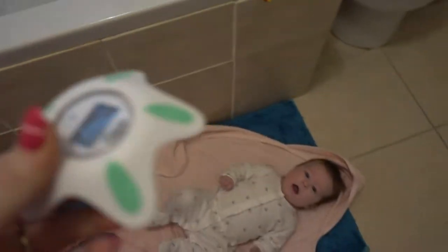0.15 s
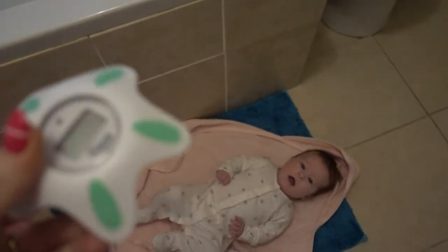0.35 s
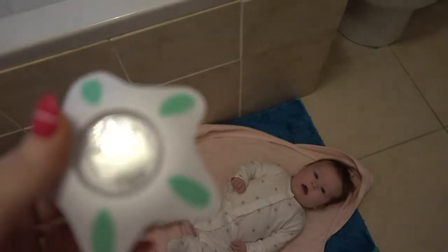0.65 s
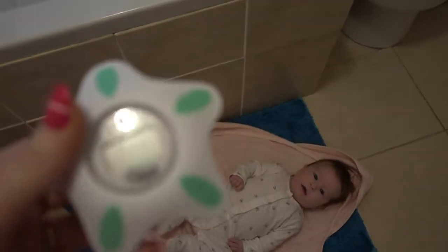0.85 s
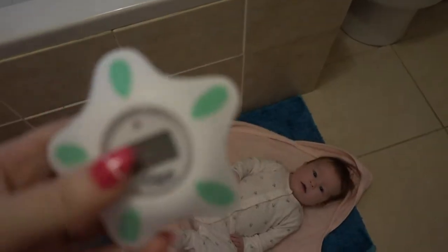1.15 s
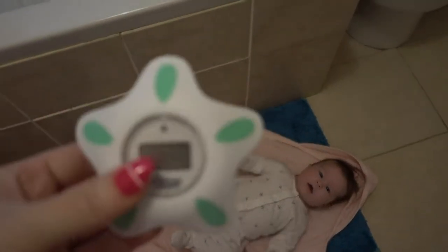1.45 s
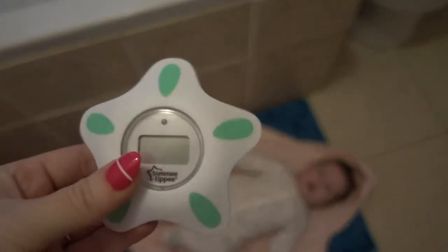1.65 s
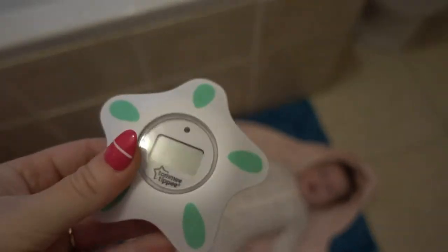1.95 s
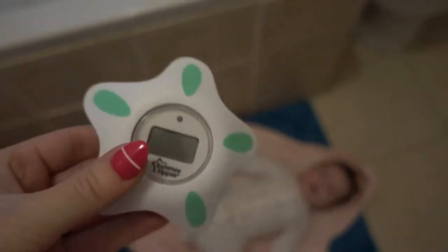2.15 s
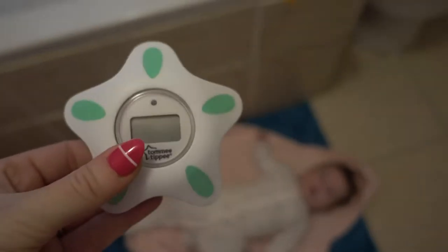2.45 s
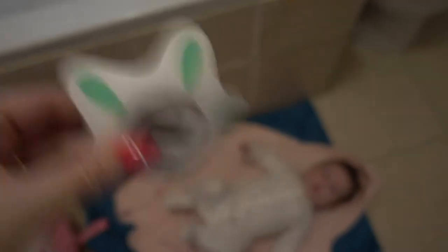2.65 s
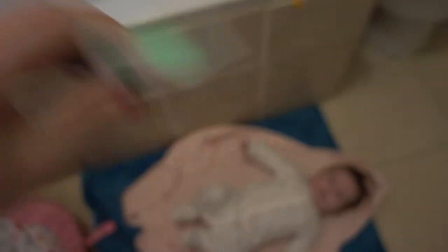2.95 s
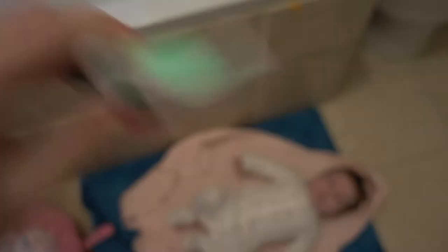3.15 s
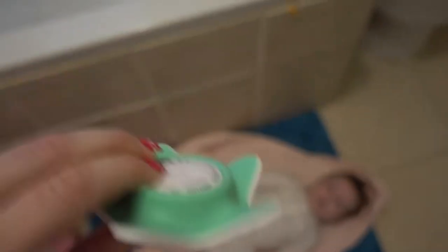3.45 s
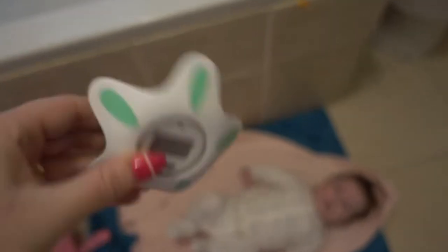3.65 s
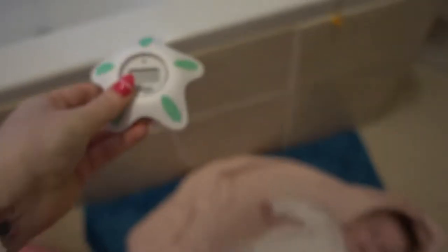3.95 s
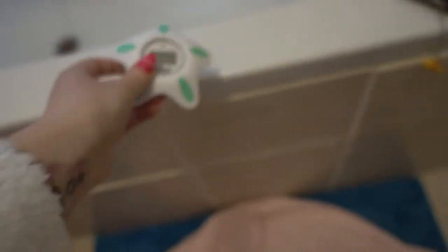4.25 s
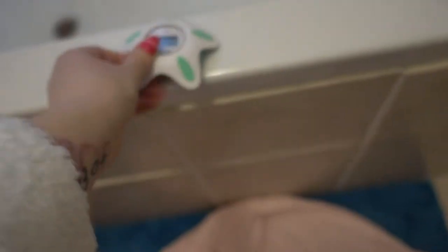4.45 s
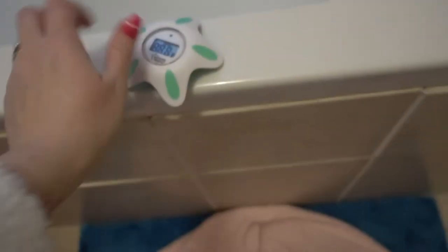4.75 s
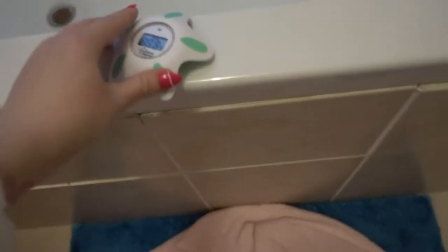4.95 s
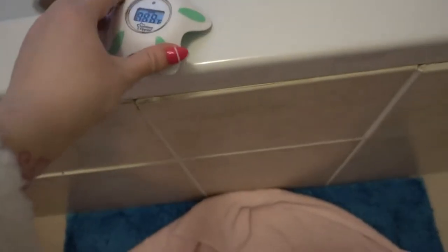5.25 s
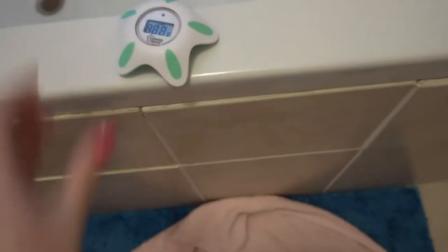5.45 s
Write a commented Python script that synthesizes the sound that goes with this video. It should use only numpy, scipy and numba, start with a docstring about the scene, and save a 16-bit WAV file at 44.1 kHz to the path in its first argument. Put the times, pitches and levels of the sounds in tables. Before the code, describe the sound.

Running bath water fills the whole scene, mid and high pitched with little bass, gurgling and spattering unevenly. Sharp droplet ticks and ringing bubble pops stand out. Late on, two quick groups of light plastic cracks and rattles, with a tiny thin ring and soft thuds, mark an object being set on the rim. Short tiled-room echoes, close stereo pickup, no fade.

```python
"""A jet from a tap plunges into a filling tub and drags air under: a dense churn of ringing bubbles.
Broken-water hiss surrounds it; harder splashes lift both, and ticks of drops and larger pops stand out.
A plastic thermometer is set down on the rim and rocks to rest: cracks, rattles, thin rings and soft thuds.
The small tiled bathroom adds echoes; two close microphone ports hear it from the floor beside the tub."""
import sys
import numpy as np
from scipy import signal
from scipy.fft import rfft, irfft, next_fast_len
from scipy.io import wavfile
from scipy.ndimage import uniform_filter1d
from numba import njit

SR = 44100
rng = np.random.default_rng(int(sys.argv[2]) if len(sys.argv) > 2 else 0)


def log_audio(samples):
    """Write samples as a 16-bit WAV file to the path given in sys.argv[1]."""
    # one column per channel
    frames = np.atleast_2d(samples).T
    # limit to full scale, then quantise
    limited = np.clip(frames, -1, 1)
    pcm = np.round(limited * 32767).astype(np.int16)
    wavfile.write(sys.argv[1], SR, pcm)


N = 246959

# Likeness of sound from all sides at the two ports: (frequency [Hz], left-right likeness [-1 to 1])
PORT_LIKENESS = [(60, 0.83), (130, 1), (290, 1), (640, 0.94), (1410, 0.79), (3100, 0.55), (6820, -0.22),
                 (10000, -0.15), (15000, -0.23)]
# Difference between the ports: (frequency [Hz], left minus right [dB])
PORT_BALANCE = [(60, 0.0), (110, 0.0), (200, -1), (380, -0.5), (700, 1.5), (1290, 0.5), (2380, 0.0),
                (4400, 0.0), (8120, -0.5), (15000, -0.5)]
# background level; each channel's own part against the shared part; mean depth of the unevenness
BACKGROUND_DB, BACKGROUND_OWN_DB, BACKGROUND_UNEVEN_DB = -78, -9, 8
BASS_CUT_HZ, TOP_CUT_HZ = 214, 15850
ROOM_T60_S, ROOM_TREBLE_T60_S, TAP_LEAD_S = 0.28, 0.054, 3e-5
ROOM_DB, NEAR_ROOM_DB = 3, -4   # echoes against direct sound: churn; sources that stand clear of it

# Pushes as the weight of the hand loads the rim: (time [s], level [dB])
RIM_PUSHES = [(4.46, -29.5), (4.49, -35), (4.52, -30), (4.68, -39.5), (4.721, -32), (4.77, -33)]
# Low modes of the rim: (frequency [Hz], relative level [dB], t60 [s])
RIM_MODES = [(180, -17, 0.087), (235, -13, 0.051), (300, -10.5, 0.053), (380, -10, .08)]
# Short bursts of a thin ring near 4.4 kHz: (time [s], peak level [dB], frequency [Hz], life [turns])
THIN_RINGS = [(4.4856, -8.5, 4380, 15), (4.4966, -24, 4360, 37), (4.501, -11.5, 4410, 33),
              (4.511, -18, 4350, 35), (4.527, -19, 4180, 34), (4.8198, -23, 4600, 36)]
# Touches of the thermometer on the rim: (time [s], click level [dB], relative rattle level [dB],
# time to the height of the rattle [s], rattle brightness [dB per octave])
TOUCHES = [(4.4009, -1, 2.5, 0.0046, 3.5), (4.412, -11, -1, 0.0037, 0.6), (4.416, -8, -15, 0.0092, 5),
           (4.4198, 0, -6, 0.015, 2), (4.457, -11, -3, 0.0044, 1.5), (4.468, -20, -12, 0.014, 6),
           (4.664, 0.5, -1.5, 0.019, 2.5), (4.6994, -1, -9, 0.02, -5), (4.7207, -5.5, -15, 0.0053, 11),
           (4.732, -14, -12, 0.0066, 7), (4.74, -22, -10, 0.021, -2), (4.8036, -15, -3.5, 0.0061, 4)]
# Modes of the plastic shell: (frequency [Hz], relative level [dB], t60 [s])
SHELL_MODES = [(298, -24, 0.04), (393, -16, 0.026), (600, -9, 0.02), (777, -16.5, 0.022),
               (1220, -11, 0.0039), (1377, -2.5, 0.013), (1620, 0, 0.0098), (1800, -1.5, 0.01),
               (2080, -3.5, 0.011), (2280, -2, 0.0098), (2336, -2, 0.016), (3273, -1.5, 0.01),
               (3380, -1.5, 0.0077), (4200, -7, 0.006), (6200, -14, 0.0027)]
CRACK_HZ, CRACK_T60_S, CRACK_BASS_CUT_HZ = 2800, 0.0015, 1140
SNAP_HZ, SNAP_DB = 4600, -7   # bright edge of the contact
CRACK_RINGS_DB = -17   # how hard the crack drives the shell
SHELL_BASS_CUT_HZ = 650   # a small shell radiates little bass

# Drops that strike with a dry tick: (time [s], level [dB], frequency [Hz])
DROP_TICKS = [(0.0158, -10, 6500), (0.287, -11, 6540), (0.2926, -8, 6500), (0.3338, -13, 1990),
              (0.563, -12, 6500), (0.576, -11, 5000), (0.585, -9, 4800), (0.762, -13, 7000),
              (0.784, -3, 11000), (4.092, -8, 8500), (4.148, -6, 7000), (4.156, -12, 8500),
              (4.263, -11, 8000), (4.284, -10, 8000), (4.298, -13, 9500), (4.367, -12, 6500),
              (1.012, -12, 1700), (2.8475, -13, 2420), (0.7362, -3, 7160), (1.075, -7, 5900),
              (1.477, -5, 7000), (1.4783, 0, 8050), (1.943, -7, 6100), (1.957, -2, 6300),
              (2.524, -10, 5830), (3.114, -9, 5500), (3.7044, -30, 5000), (4.2529, -18, 6530),
              (4.346, -6, 7040), (4.6548, -13, 6450), (4.886, -20, 6030), (4.9887, -6, 9000),
              (5.136, -4, 9000), (5.2329, -21, 6000), (5.334, -5, 7040), (5.5618, -10, 5030)]
TICK_TURNS, SPRAY_TURNS, SPRAY_PER_S, SPRAY_DB = 9, 3.1, 400, -27.5
# Larger bubbles that stand out: (time [s], level [dB], frequency [Hz])
POP_BUBBLES = [(0.333, -9, 1580), (0.404, -12, 2780), (0.4045, -8, 3730), (0.409, -6.5, 3650),
               (0.417, -14, 2700), (0.595, -14, 3200), (0.606, -13, 4200), (0.654, -13.5, 1230),
               (0.663, -12, 7750), (0.4843, -14, 6040), (0.5605, -12, 3900), (0.561, -12, 2350),
               (0.7, -7, 6900), (0.804, -12, 960), (0.818, -15, 1020), (0.84, -16.5, 965),
               (0.836, -9, 2200), (1.011, -8, 2180), (0.886, -10.5, 2780), (0.931, -16.5, 1050),
               (0.97, -12, 1520), (0.97, -12, 6000), (1.068, -15, 1760), (1.071, -10, 5800),
               (1.152, -9, 3770), (1.153, -11.5, 832), (1.172, -13, 860), (1.3523, -4, 5730),
               (1.361, -11, 2250), (1.384, -15, 1010), (1.459, -20, 1680), (1.489, -17, 940),
               (1.4706, 0, 5860), (1.4732, -3, 5800), (1.529, -10.5, 2180), (1.565, -10, 2380),
               (1.643, -12, 870), (1.66, -12.5, 860), (1.704, -11, 2720), (1.725, -11.5, 1220),
               (1.747, -11, 1170), (1.945, -2, 5600), (1.9504, -3, 5900), (1.953, -13.5, 1310),
               (1.9835, -6.5, 4440), (2.149, -9.5, 2240), (2.214, -10, 2210), (2.264, -2.5, 2780),
               (2.292, -15, 1290), (2.31, -16, 1200), (2.381, -12.5, 1200), (2.435, -12, 2230),
               (2.615, -13, 1120), (2.7347, -12.5, 3820), (2.847, -4, 2184), (2.876, -14.5, 900),
               (2.998, -15, 1120), (3.043, -14, 2250), (3.105, -9.5, 5760), (3.12, -11, 1170),
               (3.405, -7, 5270), (3.599, -13, 2400), (3.712, -17.5, 880), (3.8426, -7, 4100),
               (3.85, -10, 1180), (4.05, -9, 1080), (4.066, -9, 1010), (4.135, -3, 6500), (4.135, -9, 2000),
               (4.2512, -27, 5890), (4.357, -4, 8300), (4.3768, -4, 6350), (4.386, -8, 6800),
               (4.393, -10, 5600), (4.412, -5, 5700), (4.8028, -8, 1290), (4.9878, -6, 7600),
               (4.9, -8.5, 2340), (4.965, -19, 1090), (5.042, -8.5, 2030), (5.065, -10, 6800),
               (5.1366, -9, 6500), (5.2325, -8, 6100), (5.254, -8, 1750), (5.3328, -18, 5800),
               (5.336, -15.5, 760), (5.425, -10, 1700), (5.453, -13, 3400), (5.4877, -9, 3550),
               (5.5594, -14, 4600)]
POP_BURST_S, KIN_DB = .015, -14   # span of the weaker kin and the level of the strongest
POP_RING_LONGER, SMALL_RING_LONGER = 0.21, 0.34   # powers by which turns grow with pitch: pop, bubble

# Edges of the bass, middle and treble zones: (frequency [Hz])
ZONE_EDGES_HZ = np.array([150, 600, 5000, 16000])
# Spectrum of the jet: (frequency [Hz], relative density [dB])
JET_SPECTRUM = [(82, -65), (140, -29), (200, -36.5), (296, -30), (320, -25), (465, -14.5), (874, -0.5),
                (1060, -4.5), (1220, -1.5), (1370, -3), (2290, -2.5), (3270, -5), (5910, -2.5),
                (15500, -8.5)]
# Steady strength of the jet by zone: (time [s], bass [dB], middle [dB], treble [dB])
JET_FLOW = [(0.0, -59.5, -28, -28.5), (0.37, -51.5, -30, -34), (0.7, -55, -32.5, -29),
            (0.86, -58.5, -31, -30.5), (1.04, -57, -29, -32), (1.2, -54, -31, -31.5),
            (1.5, -60, -30, -29.5), (1.79, -57, -30, -32.5), (2.24, -63, -29, -30.5),
            (2.74, -58.5, -30.5, -33.5), (3.24, -57.5, -29, -31.5), (3.76, -47, -29.5, -33.5),
            (4.1, -57, -28, -30.5), (4.35, -50, -27, -30), (4.68, -47, -29, -31), (4.94, -51, -27, -33),
            (5.6, -48.5, -27.5, -30.5)]
# Slugs of water that move the jet level, a negative lift being a dip:
# (time [s], lift [dB], centre [octaves above 1 kHz])
WATER_SLUGS = [(0.014, 2.5, 1.5), (0.128, 7, 4), (0.181, 4.5, 3), (0.281, 12, 4), (0.345, 6.5, 2.2),
               (0.393, 3.5, 1), (0.403, 13.5, 3.5), (0.499, 7.5, 3), (0.569, 5, 4), (0.6, 3, 2),
               (0.699, 3, 4.5), (0.74, -6, 4.5), (0.804, -4, -2), (0.858, 7, 0.7), (0.886, 2.5, 3.5),
               (0.9, 5, 0), (0.945, 1, 7), (0.975, 1.5, 0), (1.05, 9, 1.4), (0.932, 5.5, 1),
               (1.009, -4, -0.1), (1.068, 4, 2.5), (1.156, 8, 5), (1.161, 8, 2.5), (1.24, 4, 6),
               (1.36, 5, 2.5), (1.49, 6.5, 2.5), (1.529, 5, 11), (1.594, 5.5, 3), (1.638, 3.5, 3.5),
               (1.651, 5, 1.2), (1.728, 7.5, 3.5), (1.732, 7.5, 2), (1.964, 11.5, 3), (1.959, 9.5, -0.16),
               (2.131, 3, 2.5), (2.146, 3, 3), (2.229, 4, 2), (2.252, 13, -0.87), (2.27, 3, 0.2),
               (2.43, 5, 2), (2.432, 5, 3), (2.515, 6.5, 2.5), (2.62, 1, 4.5), (2.675, 7, 4),
               (2.74, 5, 1.5), (2.858, 9.5, 0.84), (2.901, 9, 2), (2.971, 6.5, 1.6), (3.001, 0, 4),
               (3.045, 8, 1.5), (3.107, 7, 2.5), (3.121, -5, 7), (3.245, 3, 3.5), (3.33, 7, 2),
               (3.416, 1.5, 3), (3.426, 7.5, 1.1), (3.52, 2, 3.5), (3.522, 5, 2.5), (3.708, 9, 1.95),
               (3.722, 2, -0.5), (3.837, 3, 0.3), (3.848, 10, 2.5), (4.0, 6, 8), (4.055, 4, -0.5),
               (4.071, 3, 3), (4.142, 8.5, 2.5), (4.296, 6.5, 4.5), (4.38, 6, 2.5), (4.415, 3, 1.5),
               (4.685, 9.5, 0), (4.46, 1, 3), (4.488, 8, 3), (4.733, 3, 2), (4.816, 5.5, -0.5),
               (4.821, 9, 2.5), (4.989, 7, 4), (5.06, 1, 3), (5.142, 18, 9), (5.214, 5, 1.5),
               (5.235, 3, 4.5), (5.326, 6, 3.5), (5.438, 9, -3.5), (5.486, 4, 5.5), (5.59, 18, 4.5)]
SPLASH_RISE_S, SPLASH_FALL_S, SPLASH_OCTAVES = 0.018, 0.019, 0.68
# Resonances of the tub and its air: (frequency [Hz], width [Hz],
# relative gain before [dB] and after [dB] the microphone turns)
TUB_MODES = [(207, 4.1, 5, -4), (234.5, 3.6, 9, -8), (255, 3.9, -2, -3), (329.7, 6.6, 11.5, 1.5),
             (391, 2.3, -3, -4), (412, 2.1, 0, 7), (667, 13, -5, -8), (874, 64, -0.5, -2.5),
             (1014, 28, 0, -16), (1195, 67, 0, -16), (2230, 164, -4.5, -9), (4300, 46, -8, -3)]
TUB_DB, TURN_S, TURN_TAKES_S = -0.5, 3.58, .1
TUB_WAVER_DB, TUB_WAVER_PER_S = 4.5, 2.8   # the heaving surface makes each resonance come and go
SPOTS = 3   # places of the churn in the water, each with its own echoes
HISS_DB, HISS_TILT_DB, BUBBLES_DB = -7.5, 5.5, 0   # tilt per octave; hiss and bubbles against the jet


def from_db(db):
    """Decibels become an amplitude ratio."""
    return 10 ** (np.asarray(db) / 20)


def rms_one(x):
    """Dividing by the root mean square gives unit strength."""
    return x / np.sqrt(np.mean(x ** 2) + 1e-20)


def at_hz(points, hz):
    """A spectrum is interpolated along logarithmic frequency."""
    table = np.array(points)
    return np.interp(np.log(hz), np.log(table[:, 0]), table[:, 1])


def butter(order, edge_hz, kind, x):
    """A Butterworth filter passes its band without ripple."""
    return signal.sosfilt(signal.butter(order, edge_hz, kind, fs=SR, output="sos"), x)


def drift(rate):
    """Low-passed noise wanders slowly at unit strength; it is computed at every 20th sample."""
    r = np.exp(-40 * np.pi * rate / SR)
    noise = rng.standard_normal(N // 20 + 2002)
    slow = signal.lfilter([1], [1, -2 * r, r * r], noise)[2000:]   # drop the settling
    return np.interp(np.arange(N) / 20, np.arange(len(slow)), rms_one(slow))


def ring(clicks, hz, t60):
    """A damped resonator answers a unit click with a decaying sine of unit height."""
    r, w = from_db(-60 / (t60 * SR)), 2 * np.pi * hz / SR
    return signal.lfilter([0, np.sin(w)], [1, -2 * r * np.cos(w), r * r], clicks + 1e-18)


@njit
def add(out, spot, start, hz, size, cycles, rise, swell):
    """A damped oscillator swells for a share of its life, decays, and glides up if rise is positive."""
    for k in range(len(start)):
        for i in range(min(int(cycles[k] * SR / hz[k]), N - start[k])):
            turns = i * hz[k] / SR
            swing = np.sin(2 * np.pi * turns * (1 + rise * turns / cycles[k]))
            onset = min(turns / (swell * cycles[k]), 1.0)
            out[spot[k], start[k] + i] += size[k] * onset * np.exp(-5 * turns / cycles[k]) * swing


def ports(mid, side, hz):
    """Coherence of a diffuse field: two unrelated sounds mix into ports as alike as their spacing makes them."""
    alike = np.clip(at_hz(PORT_LIKENESS, hz), -1, 1)
    mid, side = np.sqrt((1 + alike) / 2) * mid, np.sqrt((1 - alike) / 2) * side
    return np.array([mid + side, mid - side])


def background_noise():
    """Band-limited noise: a faint low background, uneven in level from band to band, mostly shared by both channels."""
    noise = rng.standard_normal((3, N))
    white, edges = noise[0] + from_db(BACKGROUND_OWN_DB) * noise[1:], [15, 30, 50, 80, 120, 170]   # Hz
    low = 0
    for band in zip(edges, edges[1:]):
        low = low + from_db(-BACKGROUND_UNEVEN_DB * drift(3.4) ** 2) * butter(2, band, "band", white)
    return from_db(BACKGROUND_DB) * rms_one(low)


def bathroom(spots, room_db):
    """Reverberation: direct sound leads at the left port; each spot has its own decaying echoes."""
    size, t = next_fast_len(N + SR // 2), np.arange(SR // 3) / SR
    hz = np.maximum(np.fft.rfftfreq(size, 1 / SR), 1)
    noise = rng.standard_normal((2, len(spots), len(t)))
    low = butter(1, 3000, "low", noise)
    high = noise - low
    tails = low * from_db(-60 * t / ROOM_T60_S) + high * from_db(-60 * t / ROOM_TREBLE_T60_S)
    answered = t > .004   # no echo before the nearest wall answers
    tails = rfft(tails * answered)
    tails = tails / np.sqrt(uniform_filter1d(np.abs(tails) ** 2, size=150))   # walls colour no wide band
    tails = rfft(irfft(tails, len(t)) * answered * (t < .3), size)
    direct = np.exp(1j * np.pi * hz * TAP_LEAD_S * np.array([1, -1])[:, None, None])
    wet = from_db(room_db)[:, None]
    paths = (direct + wet * ports(*tails, hz)) / np.sqrt(1 + wet ** 2)
    return irfft(np.sum(rfft(spots, size) * paths, axis=1), size)[:, :N]


def rim(soft_hz=450):
    """Modal response: soft pushes set the low modes of the rim ringing."""
    s, level_db = np.transpose(RIM_PUSHES)
    out = 0
    for hz, mode_db, t60 in RIM_MODES:
        pushes = np.zeros(N)
        pushes[(s * SR).astype(int)] = from_db(level_db + mode_db + rng.normal(0, 2, len(s)))
        out = out + ring(pushes, hz, t60)
    return butter(2, soft_hz, "low", out)


def rings(swell=0.24):
    """Damped oscillation at constant pitch: short tones swell before they die."""
    s, peak_db, hz, turns = np.transpose(THIN_RINGS)
    start, out = (s * SR).astype(np.int64), np.zeros((1, N))
    size = from_db(peak_db) * np.exp(5 * swell)   # make up the decay during the swell
    add(out, 0 * start, start, hz, size, turns, 0.0, swell)
    return out


def thermometer(rattle_per_s=12000.0, scuff_db=3.0):
    """Contact excitation: a crack, then a rattle that swells and dies as bare scuffs and shell modes."""
    t, clicks = np.arange(N) / SR, np.zeros(N)
    hz, level_db, t60 = np.transpose(SHELL_MODES)
    chatter = (rng.random(N) < rattle_per_s / SR) * rng.standard_normal(N)
    into_modes = np.zeros((len(hz), N))
    for s, click_db, rattle_db, height_s, tilt_db in TOUCHES:
        late = np.maximum(t - s, 0) / height_s
        push = chatter * from_db(rattle_db - 30) * late * np.exp(.5 - .5 * late ** 2)
        push[int(s * SR)] += from_db(click_db + CRACK_RINGS_DB)
        clicks += from_db(scuff_db) * push
        clicks[int(s * SR)] -= from_db(click_db)
        mode_db = level_db + tilt_db * np.log2(hz / 1500) + rng.normal(0, 2, len(hz))
        into_modes += from_db(mode_db)[:, None] * push
    shell = sum((-1) ** k * ring(into_modes[k], hz[k], t60[k]) for k in range(len(hz)))
    snap = from_db(SNAP_DB) * ring(clicks, SNAP_HZ, CRACK_T60_S / 2)
    crack = ring(clicks, CRACK_HZ, CRACK_T60_S) + snap
    return butter(2, SHELL_BASS_CUT_HZ, "high", shell) + butter(2, CRACK_BASS_CUT_HZ, "high", crack)


def splash_db(s, hz):
    """Transient level: each slug moves the octaves round its centre quickly; they then relax."""
    at, lift_db, centre = np.transpose(WATER_SLUGS)
    late = np.asarray(s)[..., None] - at
    before, after = np.exp(-(late / SPLASH_RISE_S) ** 2), np.exp(-np.abs(late) / SPLASH_FALL_S)
    shape = np.where(late < 0, before, after)
    octaves = np.log2(np.asarray(hz)[..., None] / 1e3) - centre
    reach = np.exp(-.5 * (octaves / SPLASH_OCTAVES) ** 2)
    return np.sum(lift_db * shape * reach, axis=-1)


def jet_db(s, hz):
    """Spectral level per 10 Hz: the jet spectrum, moved by zone levels blended across pitch, plus splashes."""
    grid = np.arange(ZONE_EDGES_HZ[0], ZONE_EDGES_HZ[-1], 10)
    zone_power = np.bincount(np.digitize(grid, ZONE_EDGES_HZ) - 1, from_db(2 * at_hz(JET_SPECTRUM, grid)))
    log_centres = np.log(ZONE_EDGES_HZ[1:] * ZONE_EDGES_HZ[:-1]) / 2
    place = np.interp(np.log(hz), log_centres, np.arange(len(zone_power)))
    times, *levels_db = np.transpose(JET_FLOW)
    moved_db = 0
    for k, level_db in enumerate(levels_db):
        share = np.maximum(1 - np.abs(place - k), 0)
        moved_db = moved_db + share * (np.interp(s, times, level_db) - 10 * np.log10(zone_power[k]))
    return at_hz(JET_SPECTRUM, hz) + moved_db + splash_db(s, hz)


def jet_rms():
    """Powers add: the mean strength of the jet over time, summed over pitch in steps of 200 Hz."""
    s, hz = np.arange(0, N / SR, .01)[:, None], np.arange(250, 16000, 200)
    return np.sqrt(20 * np.sum(from_db(2 * jet_db(s, hz))) / len(s))


def ticks():
    """Impact: drops hit water or enamel and die within a few turns; random small ones follow the splashes."""
    draw = rng.random((int(SPRAY_PER_S * N / SR), 3))
    s, hz = draw[:, 0] * N / SR, 3000 * 4 ** draw[:, 1]
    spray_db = SPRAY_DB + 0.75 * splash_db(s, hz) - 1.5 * np.log(np.maximum(draw[:, 2], .02))
    s, level_db, hz = np.hstack([np.transpose(DROP_TICKS), [s, spray_db, hz]])
    start, out = (s * SR).astype(np.int64), np.zeros((1, N))
    turns = np.where(np.arange(len(hz)) < len(DROP_TICKS), TICK_TURNS, SPRAY_TURNS)
    add(out, 0 * start, start, hz, from_db(level_db), turns, 0.0, .05)
    return out


def pops(cycles=13.3, rise=0.0071, scatter=0.038, swell=0.16):
    """Bubble resonance: a pocket of air breaks up into one bubble, then five weaker kin of like size."""
    s, level_db, hz = np.transpose(POP_BUBBLES)[:, :, None]
    late, tune = np.moveaxis(rng.random((len(POP_BUBBLES), 6, 2)), 2, 0)
    kin = np.arange(6) > 0
    start = ((s + kin * late * POP_BURST_S) * SR).ravel().astype(np.int64)
    pitch = (hz * (1 + kin * scatter * (2 * tune - 1))).ravel()
    size = from_db(level_db + kin * (KIN_DB - 6 * late)).ravel()
    out = np.zeros((1, N))
    turns = cycles * (pitch / 1e3) ** POP_RING_LONGER
    add(out, 0 * start, start, pitch, size, turns, rise, swell)
    return out


def hiss(patchy_db=0.5, shared_db=1.8):
    """Turbulent noise: broken water from all sides, in narrow bands that flicker partly together."""
    white, out, s = rng.standard_normal((2, 2, N)), 0, np.arange(N) / SR
    together = drift(5.2)
    edges = np.geomspace(140, 17500, 17)
    for k, (low, high) in enumerate(zip(edges, edges[1:])):
        mid, side = butter(2, [low, high], "band", white[k % 2])   # neighbouring bands are unrelated
        hz = np.sqrt(low * high)
        flicker_db = patchy_db * drift(6.2) + shared_db * together
        level_db = np.interp(s, s[::64], jet_db(s[::64], hz)) + HISS_TILT_DB * np.log2(hz) + flicker_db
        out = out + from_db(level_db) * ports(mid, side, hz)
    return from_db(HISS_DB) * jet_rms() * rms_one(out)


def tub(x):
    """Cavity resonance: tub and air favour a few pitches, which waver and change as the microphone turns."""
    out, turned = x.copy(), (1 + np.tanh((np.arange(N) / SR - TURN_S) / TURN_TAKES_S)) / 2
    for hz, width, before_db, after_db in TUB_MODES:
        r = np.exp(-np.pi * width / SR)
        waver_db = TUB_WAVER_DB * np.tanh(drift(TUB_WAVER_PER_S))
        level_db = TUB_DB + before_db + turned * (after_db - before_db) + waver_db
        feed, back = (1 - r * r) / 2 * np.array([1, 0, -1]), [1, -2 * r * np.cos(2 * np.pi * hz / SR), r * r]
        out += from_db(level_db) * signal.lfilter(feed, back, x)
    return out * np.std(x) / np.std(out)   # colour without a change of overall strength


def life(cycles, hz):
    """Damping: the turns a bubble rings grow with pitch from those of one at 1 kHz."""
    return cycles * (hz / 1e3) ** SMALL_RING_LONGER


def bubbles(per_s=5000, spread_db=4.0, cycles=29.5, rise=0.088, swell=0.041):
    """Bubble resonance: bubbles of many sizes are born at random and glide up as they near the surface."""
    draw = rng.random((int(per_s * N / SR), 4))
    hz = 150 + 15500 * draw[:, 0] ** 2.5
    start, spot = (draw[:, 2] * N).astype(np.int64), (draw[:, 3] * SPOTS).astype(np.int64)
    tail_db = -spread_db * np.log(np.maximum(draw[:, 1], .02))   # a few are far stronger than the rest
    size = hz ** .67 * from_db(jet_db(start / SR, hz) + tail_db)
    out = np.zeros((SPOTS, N))
    add(out, spot, start, hz, size, life(cycles, hz), rise, swell)
    return from_db(BUBBLES_DB) * jet_rms() * rms_one(out) / np.sqrt(SPOTS)


def scene():
    """Superposition: churn in the tub, pops with ticks, and the rim sounds share the room; hiss surrounds them."""
    spots = np.vstack([tub(bubbles()), pops() + ticks(), thermometer() + rings() + rim()])
    return bathroom(spots, [ROOM_DB] * SPOTS + [NEAR_ROOM_DB] * 2) + tub(hiss())


def record(dry):
    """Linear filtering: the bass is cut, faint background noise joins, the ports differ a little, the top is cut."""
    heard = butter(6, BASS_CUT_HZ, "high", dry) + background_noise()
    hz = np.maximum(np.fft.rfftfreq(N, 1 / SR), 1)
    lean_db = at_hz(PORT_BALANCE, hz) / 2 * np.array([[1], [-1]])
    heard = irfft(rfft(heard) * from_db(lean_db), N)
    return signal.sosfilt(signal.ellip(14, .3, 85, TOP_CUT_HZ, fs=SR, output="sos"), heard)


dry = scene()
out = record(dry)
log_audio(out)
```